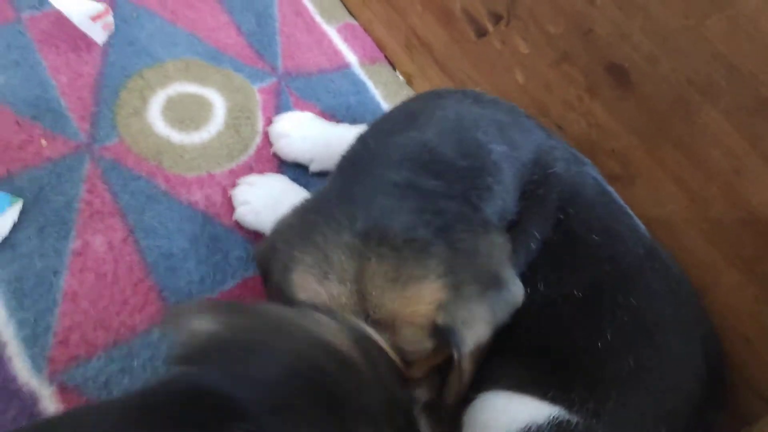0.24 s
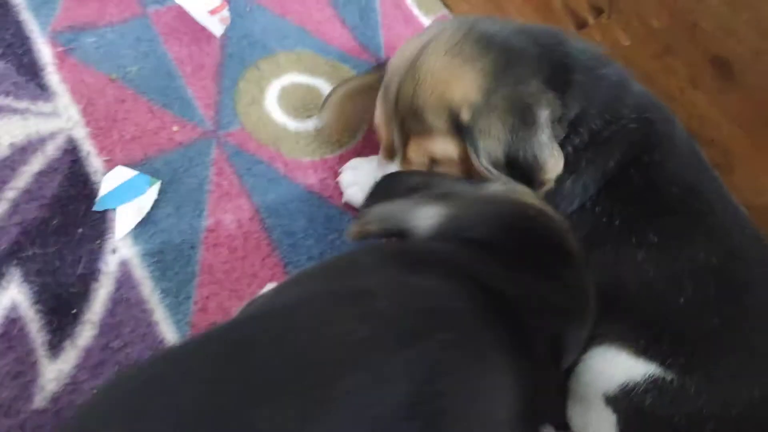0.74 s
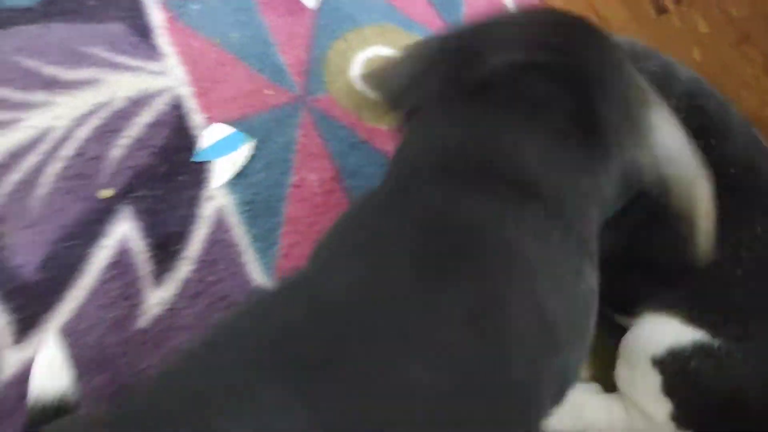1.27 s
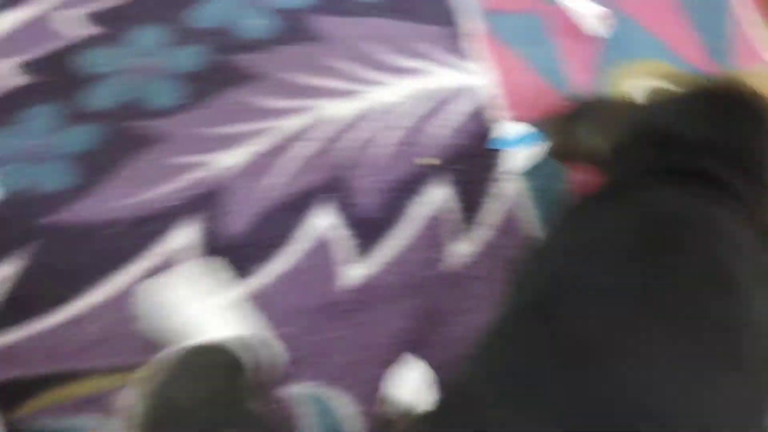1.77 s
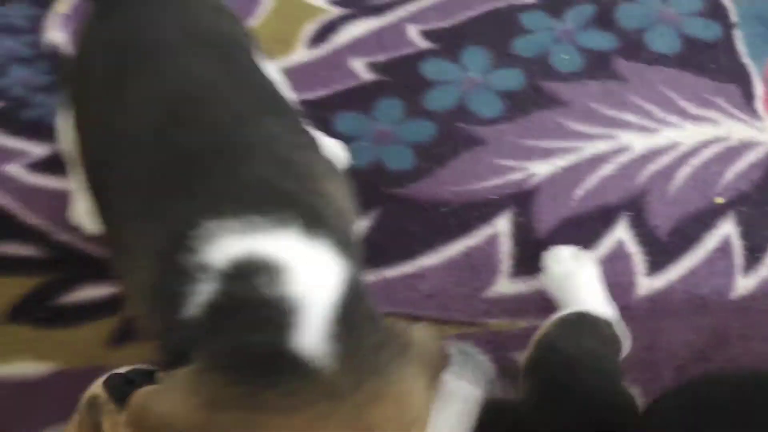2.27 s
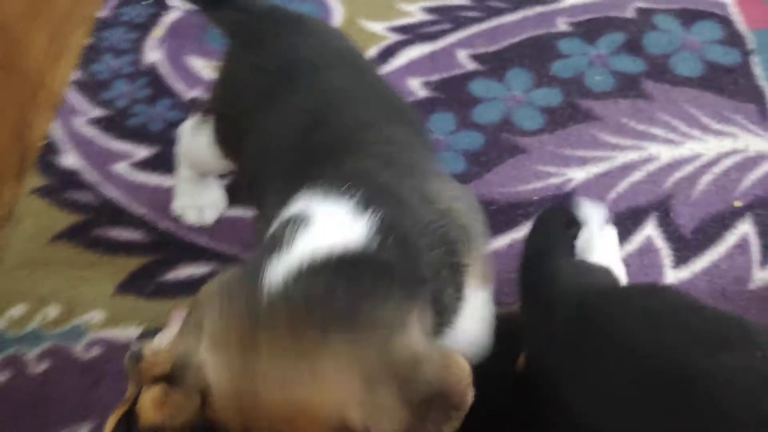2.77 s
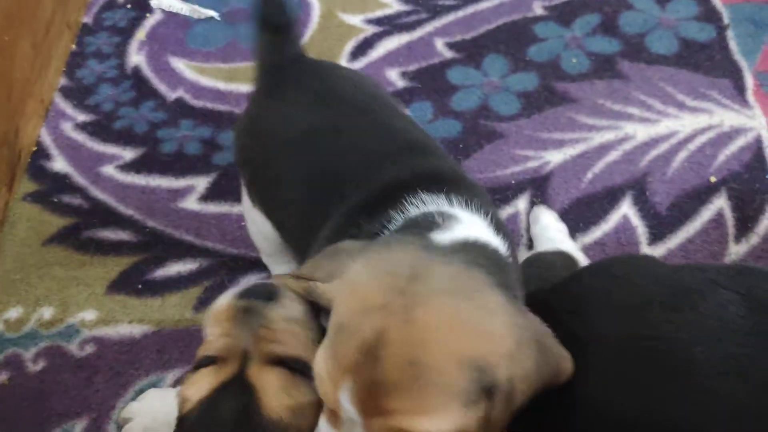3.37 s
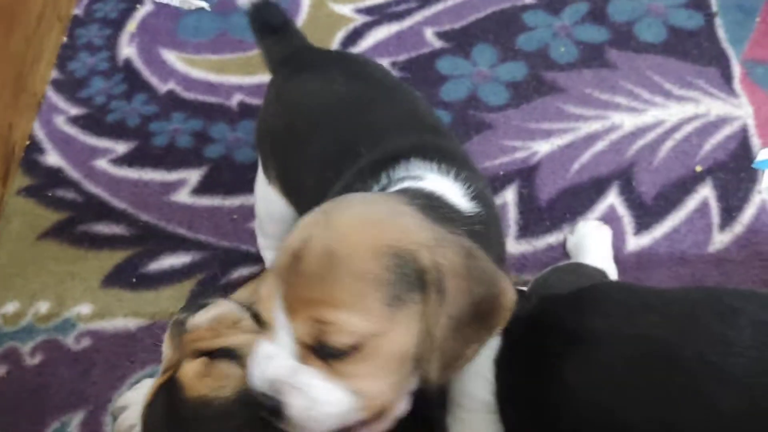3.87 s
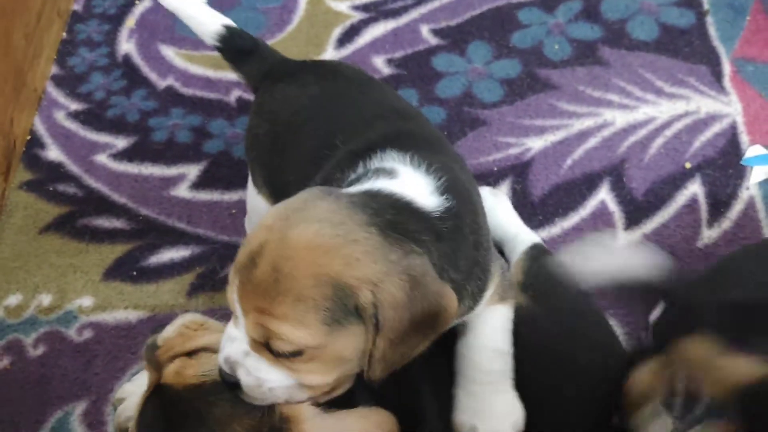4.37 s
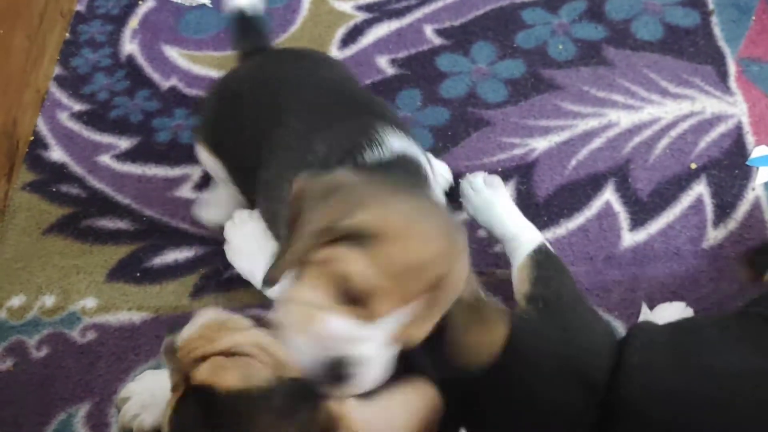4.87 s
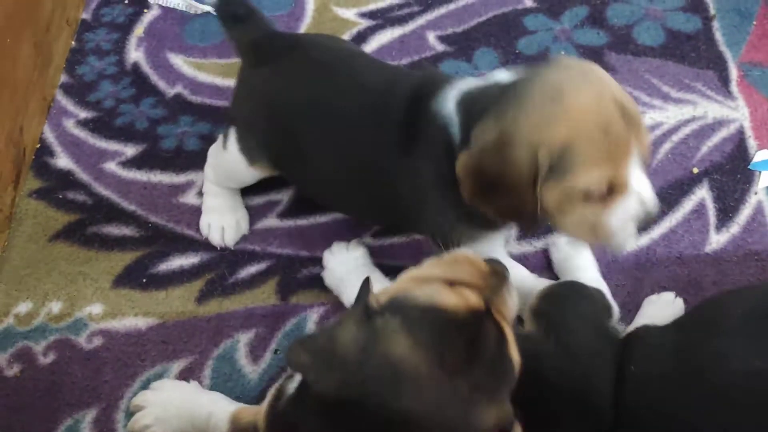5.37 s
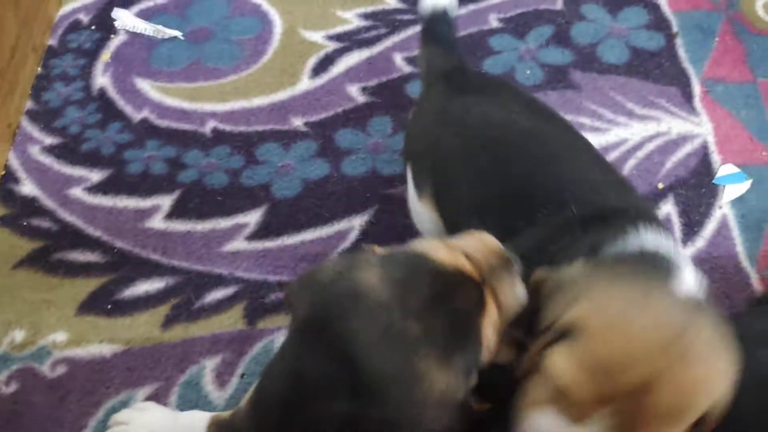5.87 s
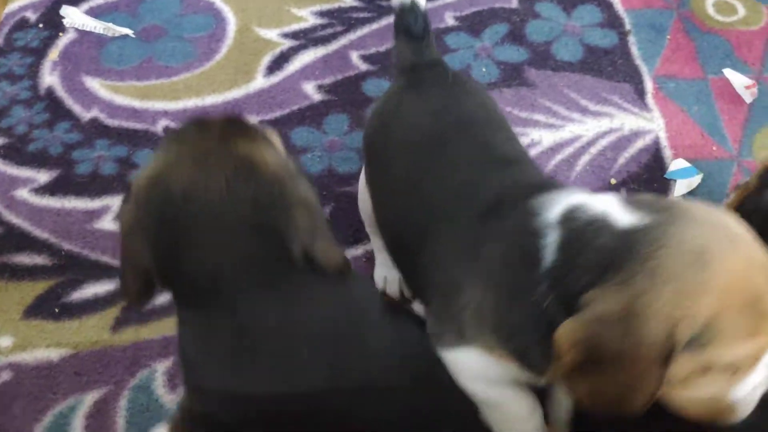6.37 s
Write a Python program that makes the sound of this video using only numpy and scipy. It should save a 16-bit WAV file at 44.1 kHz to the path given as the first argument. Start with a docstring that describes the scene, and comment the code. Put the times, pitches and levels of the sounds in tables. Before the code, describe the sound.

Close to the microphone, young puppies tussle on a rug in a small, quiet room. Over soft air, low rumble and rustling fur come a short falling grunt and thin nasal whimpers. A cluster of soft thuds and brushes follows, then a tight high squeal among faint growls, and a longer, wider cry that slides down into rough growls. One last faint bump and fur rustle end it.

```python
"""A distant whimper is heard first, over quiet air, a low rumble and rustling fur; thin birdlike whistles follow.
Near by, puppies wrestle on a rug in a small room: a grunt, then thin whimpers, soft bumps of paws and bodies,
and a tight cry among low growls. A second, wider cry slides down into growls, and a last bump follows.
Near voices are stacks of harmonics, bumps are ringing tones started by clicks, fur and air are coloured noise,
and the far calls are noise through narrow resonances."""
import sys
import numpy as np
from scipy import signal
from scipy.fft import rfft, irfft, next_fast_len
from scipy.io import wavfile

SR = 44100
rng = np.random.default_rng(int(sys.argv[2]) if len(sys.argv) > 2 else 0)


def store_pcm(level_fs):
    """Save levels as 16-bit WAV."""
    pcm = np.round(np.clip(level_fs, -1, 1) * 32767).astype(np.int16)
    wavfile.write(sys.argv[1], SR, np.atleast_2d(pcm).T)


N = 292250
TIME = np.arange(N) / SR   # seconds

# Tone of the still room air. Each row: frequency in Hz, level in dB per Hz.
AIR_COLOUR = [(59, -30), (100, -1.5), (209, -9), (386, -6.5), (697, -11.5), (898, -15.5), (1160, -15.5),
              (1310, -17), (2930, -18.5), (4560, -24), (15500, -40)]
AIR_DB = -79   # before wide_noise adds 3 dB
# Tone of the low rumble. Each row: frequency in Hz, level in dB per Hz.
RUMBLE_COLOUR = [(11, -33.5), (18, 4), (65, -3), (86, -9), (129, -11.5), (157, -19), (203, -9), (300, -16),
                 (390, -50.5), (660, -120)]
RUMBLE_DB, RUMBLE_SWING_DB, RUMBLE_SWING_HZ = -74, 1.5, 0.89   # level before wide_noise adds 3 dB
# Faint far calls: a distant whimper at the start (two rows), then thin birdlike whistles.
# Each row: start in seconds, length in seconds, pitch in Hz, level in dB.
FAR_CALLS = [(0, 0.55, 2136, -87), (0.075, 0.45, 1180, -84), (0.708, 0.76, 3370, -75.5),
             (0.793, 0.16, 3000, -78), (5.446, 0.96, 3270, -90.5), (5.935, 1, 2934, -82)]
# How alike the noise is on both sides. Each row: frequency in Hz, likeness from 0 to 1.
LIKENESS = [(30, .9), (300, 0.95), (1000, 0.067), (4000, 0.051), (14000, 0.067)]

# Coats sliding slowly over each other.
# Each row: start in seconds, length in seconds, level in dB before wide_noise adds 3 dB.
FUR_SLIDES = [(-.4, 2.15, -85), (0.71, 1.42, -72.5), (1.667, 2.05, -84), (6.36, 0.87, -74.5)]
# Fur brushing on the rug.
# Each row: start in seconds, length in seconds, level in dB before wide_noise adds 3 dB.
FUR_BRUSHES = [(0.59, 0.022, -68.5), (1.441, 0.02, -73), (2.509, 0.055, -73.5), (2.545, 0.14, -69.5),
               (2.724, 0.11, -73), (2.908, 0.089, -67), (3, 0.033, -72.5), (5.262, 0.0096, -63.5),
               (6.104, 0.061, -74.5)]
# Tone of the rustling coats. Each row: frequency in Hz, level in dB per Hz.
RUSTLE_COLOUR = [(600, -26.5), (1600, -15), (3200, -11.5), (6000, -9.5), (9000, -11), (15500, -12)]
# Tone of the brushing on the rug. Each row: frequency in Hz, level in dB per Hz.
BRUSH_COLOUR = [(400, -1), (1250, -2.5), (2000, -11), (3800, -7.5), (7700, -8.5), (15000, -20)]
RUSTLE_DB = -85   # fur never lies quite still; before wide_noise adds 3 dB

# Grunts and growls. Each row: start in seconds, length in seconds, first pitch in Hz, last pitch in Hz,
# rise in seconds, fade in dB, peak level in dB, octave in dB from the peak, overtones in dB from the peak.
GROWLS = [ (0.583, 0.19, 352.3, 183.7, 0.048, 23, -44, -10, -17.5),
          (0.777, 0.067, 211.6, 175, 0.013, 2.5, -69, 6, -7.5),
          (2.732, 0.046, 267, 343, 0.016, 8, -52, -11.5, -19.5),
          (3.675, 0.22, 179.1, 192.6, .07, 11, -62.5, -9.5, -18.5),
          (3.848, .2, 154.9, 199, 0.16, 26, -63.5, -5.5, -19.5),
          (5.071, 0.17, 239.9, 208.2, 0.03, 1.5, -50.5, -20.5, -7),
          (5.229, .265, 228.3, 199.9, 0.054, 16, -47.5, -15.5, -11),
          (5.772, .048, 231.4, 235.6, 0.016, 9, -64.5, -16.5, -6),
          (5.836, .066, 176.3, 169.8, 0.034, 9, -59, -10, -7)]
# Throat and mouth resonances of the growls. Each row: frequency in Hz, level in dB.
GROWL_THROAT = [(450, -3.5), (680, 8.5), (850, 2), (1020, -11.5), (1300, -6.5), (1900, -16), (2700, -18.5),
                (3800, -16.5), (5500, -30.5), (8000, -14.5), (13000, -28.5)]
GROWL_SWELL_DB = 5.5   # from the first beat of the folds to the peak

# Whimpers. Each row: start in seconds, length in seconds, first pitch in Hz, held pitch in Hz,
# settling time in seconds, final sag as a share of the pitch, rise in seconds, swell in dB,
# peak level in dB, octave in dB from the peak, overtones in dB from the peak.
WHIMPERS = [ (1.257, 0.035, 1220, 1348, 0.01, 0, 0.0073, 16, -55.5, -26, -32),
            (1.581, 0.23, 1510, 1453, .09, 0, 0.25, 22, -43, -19, -10),
            (2.029, .32, 1164, 1416, .042, .12, 0.21, 12, -47, -12, -7),
            (2.508, 0.015, 1250, 1120, 0.0078, 0.01, 0.0036, 8, -61.5, -13, -25),
            (2.528, 0.062, 1024, 945, 0.0454, 0, 0.025, 10, -67.5, 4, -16),
            (2.582, 0.03, 916, 790, 0.0175, 0.042, 0.013, 7, -50.5, -17.5, -18)]
# Throat and mouth resonances of the whimpers. Each row: frequency in Hz, level in dB.
WHIMPER_THROAT = [(2500, 2), (3400, -11), (4250, -7), (5000, 3), (5700, -16), (7100, -23), (8500, -27),
                  (10000, -31), (12700, -25), (15500, -51.5)]
WHIMPER_FADE_DB, WHIMPER_SAG_S = 7.5, 0.038   # as the air runs out, level and pitch drop
# shares of the swell and fade that the upper harmonics take
WHIMPER_OCTAVE_FOLLOWS, WHIMPER_OVERTONES_FOLLOW = 0.7, 0.71

# Bumps of paws and bodies. Each row: start in seconds, level in dB before fixed cuts in bumps(),
# brightness in dB (level of the tick against the thud, before those cuts).
BUMPS = [(2.663, -47.5, 2), (2.763, -47.5, -23), (2.909, -42.5, -3), (2.994, -49, 1), (6.112, -56, -13)]
# Tones inside the thud. Each row: pitch in Hz, level in dB, time to fall by 60 dB in seconds.
BUMP_MODES = [(200, -51, 0.022), (378, 6, 0.012), (605, 8.5, 0.0072), (1110, 6.5, 0.0033)]

# Pitch of the first, tight cry. Each row: time in seconds, pitch in Hz.
TIGHT_CRY_PITCH = [(3.757, 1000), (3.775, 996), (3.805, 1101), (3.849, 1054), (3.889, 1109), (4.027, 1055),
                   (4.055, 1123), (4.099, 990), (4.11, 1035)]
# Pitch of the second cry, which slides down. Each row: time in seconds, pitch in Hz.
SLIDING_CRY_PITCH = [(4.35, 923.4), (4.44, 1078), (4.504, 1041), (4.528, 982.5), (4.566, 1012),
                     (4.608, 978), (4.634, 977.5), (4.702, 922.2), (4.724, 968), (4.784, 922),
                     (4.824, 956.6), (4.902, 887.4), (4.942, 797.6), (4.97, 656), (5.002, 609),
                     (5.032, 588), (5.06, 609.5)]
# Loudness of the tight cry before the gains in cries().
# Each row: time in seconds, fundamental in dB, octave in dB, overtones in dB.
TIGHT_CRY_LEVEL = [(3.757, -53, -63.5, -65.5), (3.793, -53, -47.5, -54.5), (3.819, -45.5, -56.5, -55.5),
                   (3.961, -43.5, -55.5, -51), (4.013, -39.5, -28.5, -49), (4.027, -43, -23, -43.5),
                   (4.061, -38, -34.5, -50.5), (4.11, -57.5, -50, -60)]
# Loudness of the sliding cry before the gains in cries().
# Each row: time in seconds, fundamental in dB, octave in dB, overtones in dB.
SLIDING_CRY_LEVEL = [(4.35, -54, -43.5, -53.5), (4.372, -70, -40, -44), (4.442, -53.5, -40, -50),
                     (4.5, -58.5, -44.5, -49), (4.528, -69, -35, -46.5), (4.57, -55, -43.5, -41.5),
                     (4.61, -57, -25, -46), (4.746, -61, -36, -49), (4.908, -49.5, -41.5, -40),
                     (4.952, -42, -36.5, -38.5), (5.008, -54.5, -50, -53.5), (5.052, -52, -59, -51.5),
                     (5.06, -51.5, -59, -60.5)]
# Throat resonances: one list for the tight cry, one for the wider. Each row: frequency in Hz, level in dB.
CRY_THROATS = [
    [(1900, 4), (2700, -43), (3250, -6.5), (3700, -17.5), (4300, -1), (4900, -21.5), (5450, 6.5),
     (6400, -32), (7600, -18), (8700, -25.5), (10000, -37), (12500, -30.5), (15500, -45)],
    [(1900, 8.5), (2400, -22), (2950, -10.5), (3350, -11.5), (3900, 10), (4500, -1.5), (5200, 3.5),
     (6200, -18.5), (7000, -13), (8500, -20.5), (10000, -27), (12500, -31.5), (15500, -48.5)],
]

# hoarseness from 0 to 1: when settled, extra at the onset, and of slack folds
CLEAR, ONSET_ROUGH, SLACK_ROUGH = .18, .7, .85
SETTLE_S = 0.019   # the rough onset dies away
TAUT_HZ, SLACK_HZ = 930, 560
FADE_IN_S, FADE_OUT_S = 0.005, 0.0044
# Moments when the voice cracks and then settles again, in seconds.
VOICE_BREAKS = [2.14, 2.303, 3.997]

# Where the puppies are. Each row: time in seconds, left against right in dB.
PLACE = [(.6, -3), (1.7, -2.5), (2.2, -1.5), (2.7, -9), (3.9, -5), (4.1, -0.5), (4.6, -6), (5.2, 1),
         (6.2, -3)]
# Sound bends round the recorder to the left port. Each row: frequency in Hz, lag in milliseconds.
PORT_LAG = [(200, 0.073), (1000, 0.23), (1500, 0.063), (2100, 0.13), (3000, .15), (4100, 0.18),
            (5300, 0.15), (8000, .165)]
# How long the room rings. Each row: frequency in Hz, time to fall by 60 dB in seconds.
ROOM_T60 = [(150, 0.16), (600, 0.43), (2000, 0.33), (5000, 0.36), (14000, 0.061)]
# Tone of the reflections as they begin. Each row: frequency in Hz, relative level in dB.
ROOM_COLOUR = [(200, 0.5), (1000, -0.5), (2000, 3.5), (4000, -3.5), (10000, -0.5)]
# Two microphone ports colour the sound differently. Each row: frequency in Hz, left against right in dB.
PORTS = [(600, 0), (900, 2), (1150, -5), (1500, 1), (2100, 6.5), (3000, 3), (4400, 4.5), (5500, -2),
         (8000, -10), (10000, 0.5), (12000, 7.5), (15000, 15)]
CUTOFF_HZ = 15550


def from_db(db):
    """Turn decibels into a plain multiplier."""
    return 10 ** (np.asarray(db) / 20)


def rms_one(x):
    """Scale a sound to an average strength (rms) of 1."""
    return x / np.sqrt(np.mean(x ** 2) + 1e-20)


def in_time(rows, t):
    """Read the columns of a curve at times t."""
    s, *columns = np.transpose(rows)
    return [np.interp(t, s, c) for c in columns]


def at_hz(points, hz):
    """Read a curve over frequency, with equal steps per octave."""
    f, value = np.transpose(points)
    return np.interp(np.log(np.maximum(hz, 1)), np.log(f), value)


def drift(rate_hz, size):
    """Random wandering of spread 1, mostly slower than the given rate."""
    padded = next_fast_len(max(size, SR), real=True)
    hz = np.fft.rfftfreq(padded, 1 / SR)
    spectrum = rfft(rng.standard_normal(padded)) / (1 + (hz / rate_hz) ** 2)
    return rms_one(irfft(spectrum, padded))[:size]


def noise(colour, size):
    """Noise with the given spectrum, falling steeply beyond its ends; rms 1."""
    padded = next_fast_len(size, real=True)
    hz = np.fft.rfftfreq(padded, 1 / SR) + 1
    low_end = 1 / (1 + (.8 * colour[0][0] / hz) ** 6)
    high_end = 1 / (1 + (hz / colour[-1][0] / 1.2) ** 6)
    spectrum = rfft(rng.standard_normal(padded)) * from_db(at_hz(colour, hz)) * low_end * high_end
    return rms_one(irfft(spectrum, padded)[:size])


def wide_noise(colour):
    """Stereo noise, alike in the bass and nearly unrelated in the treble; each side is 3 dB above rms 1."""
    mid, side = noise(colour, N), noise(colour, N)
    padded = next_fast_len(N, real=True)
    alike = np.clip(at_hz(LIKENESS, np.fft.rfftfreq(padded, 1 / SR)), 0, 1)
    shared = np.sqrt(1 + alike) * rfft(mid, padded)
    opposed = np.sqrt(1 - alike) * rfft(side, padded) * [[1], [-1]]
    return irfft(shared + opposed, padded)[:, :N]


def swell(start, length):
    """A quick rise and a slower fall, height 1."""
    return np.sin(np.pi * np.sqrt(np.clip((TIME - start) / length, 0, 1)))


def ring(clicks, hz, t60):
    """A unit click sets a sine of about height 1 ringing; it falls by 60 dB in t60 seconds."""
    r, w = from_db(-60 / (t60 * SR)), 2 * np.pi * hz / SR
    return signal.lfilter([0, np.sin(w)], [1, -2 * r * np.cos(w), r * r], clicks + 1e-18)


def background():
    """Room air and a low wavering rumble are noise; the faint far calls are noise that rings at one pitch."""
    far = 0
    for start, length, hz, db in FAR_CALLS:
        far_tone = rms_one(ring(rng.standard_normal(N), hz, 0.12))
        far = far + from_db(db) * swell(start, length) * far_tone
    rumble_db = RUMBLE_DB + RUMBLE_SWING_DB * drift(RUMBLE_SWING_HZ, N)
    rumble = from_db(rumble_db) * wide_noise(RUMBLE_COLOUR)
    return from_db(AIR_DB) * wide_noise(AIR_COLOUR) + rumble + far


def fur():
    """Coats slide over each other and brush the rug: noise that swells with each movement."""
    strokes = sum(from_db(db) * swell(s, length) for s, length, db in FUR_BRUSHES)
    sliding = 0
    for start, length, db in FUR_SLIDES:
        progress = np.clip((TIME - start) / length, 0, 1)
        sliding = sliding + from_db(db) * np.sin(np.pi * progress) ** 2
    rustle = (from_db(RUSTLE_DB) + sliding) * from_db(0.95 * drift(10, N))
    return strokes * wide_noise(BRUSH_COLOUR) + rustle * wide_noise(RUSTLE_COLOUR)


def span(start, length):
    """The sample times of one call."""
    return TIME[(TIME >= start) & (TIME < start + length)]


def effort_db(age, rise, swell_db, fade_db):
    """A call swells to its peak (0 dB), then fades until it ends."""
    rise = np.clip(rise, age[1], age[-2])
    return np.interp(age, [0, rise, age[-1]], [-swell_db, 0, -fade_db])


def hoarseness(t, pitch):
    """Folds are rough at the onset and after a break, then settle; slack at low pitch, they beat unevenly."""
    slack = np.interp(pitch, [SLACK_HZ, TAUT_HZ], [SLACK_ROUGH, CLEAR])
    upset = sum((t >= s) * np.exp(-np.abs(t - s) / SETTLE_S) for s in [t[0], *VOICE_BREAKS])
    return np.clip(slack + ONSET_ROUGH * upset, 0, 1)


def call(t, pitch, levels_db, throat, waver, jitter, shimmer_db, flutter_db, rasp_db, count):
    """Vocal folds give a stack of harmonics; the throat shapes those above the octave."""
    first_db, octave_db, upper_db = levels_db
    hoarse = hoarseness(t, pitch)
    pitch = pitch * (1 + waver * drift(30, len(t)))
    # hoarse folds change their period and their swing from one cycle to the next
    cycle_hz = np.mean(pitch) / 2
    uneven_pitch = pitch * (1 + jitter * hoarse * drift(cycle_hz, len(t)))
    phase = 2 * np.pi * np.cumsum(uneven_pitch) / SR
    swing = from_db(shimmer_db * hoarse * drift(cycle_hz, len(t)))
    k = np.arange(3, count)[:, None]   # harmonic numbers
    # each overtone flutters on its own as the head twists
    flutter = flutter_db * np.array([drift(14, len(t)) for _ in k])
    gains = from_db(at_hz(throat, k * pitch) + flutter) * (k * pitch < CUTOFF_HZ)
    waves = np.sin(k * phase + rng.uniform(0, 2 * np.pi, k.shape))
    # the throat sets the balance of the overtones, not their total level
    overtones = np.sum(gains * waves, axis=0) / np.sqrt(np.sum(gains ** 2, axis=0))
    # air hisses through the folds once a cycle
    rasp = from_db(rasp_db) * hoarse * noise(throat, len(t)) * (1 + np.cos(phase)) / 2
    tone = from_db(first_db) * np.sin(phase) + from_db(octave_db) * np.sin(2 * phase)
    tone = tone + from_db(upper_db) * (overtones + rasp)
    fade_in = np.clip((t - t[0]) / FADE_IN_S, 0, 1)
    fade_out = np.clip((t[-1] - t) / FADE_OUT_S, 0, 1)
    out = np.zeros(N)
    # the root of 2 makes each sine's rms match its level
    out[np.rint(t * SR).astype(int)] = np.sqrt(2) * tone * fade_in * fade_out * swing
    return out


def growls():
    """Slack folds beat unevenly while the pitch glides from first to last."""
    out = 0
    for start, length, first_hz, last_hz, rise, fade_db, peak_db, octave_db, upper_db in GROWLS:
        t = span(start, length)
        pitch = np.linspace(first_hz, last_hz, len(t))
        level = peak_db + effort_db(t - t[0], rise, GROWL_SWELL_DB, fade_db)
        levels = level, level + octave_db, level + upper_db
        out = out + call(t, pitch, levels, GROWL_THROAT, waver=.042, jitter=.07,
                         shimmer_db=2.5, flutter_db=0.5, rasp_db=-3.5, count=30)
    return out


def whimpers():
    """Thin whines through the nose: each moves onto a held pitch, swells, and fades; some sag at the end."""
    out = 0
    for (start, length, first_hz, held_hz, settling, sag, rise,
         swell_db, peak_db, octave_db, upper_db) in WHIMPERS:
        t = span(start, length)
        age, left = t - t[0], t[-1] - t
        pitch = held_hz + (first_hz - held_hz) * np.exp(-(age / settling) ** 3)
        pitch = pitch * (1 - sag * np.exp(-(left / WHIMPER_SAG_S) ** 2))
        effort = effort_db(age, rise, swell_db, WHIMPER_FADE_DB)
        levels = (peak_db + effort,
                  peak_db + octave_db + WHIMPER_OCTAVE_FOLLOWS * effort,
                  peak_db + upper_db + WHIMPER_OVERTONES_FOLLOW * effort)
        out = out + call(t, pitch, levels, WHIMPER_THROAT, waver=0.0047, jitter=0.049,
                         shimmer_db=1.0, flutter_db=4.0, rasp_db=-3.5, count=13)
    return out


def bumps():
    """Paws and bodies land on the rug: a dead thud of short ringing tones, with a small tick on top."""
    s, level_db, bright_db = np.transpose(BUMPS)
    at = (s * SR).astype(int)
    clicks, ticks = np.zeros(N), np.zeros(N)
    clicks[at] = from_db(level_db - 8.5)
    ticks[at] = from_db(level_db + bright_db - 2)
    thud = sum(ring(clicks, hz, t60) * from_db(db) for hz, db, t60 in BUMP_MODES)
    return thud + ring(ticks, 2250, 0.0023)


def cry(pitches, levels, throat, first_gain_db, octave_gain_db, upper_gain_db):
    """One open-mouthed squeal: harmonics follow drawn curves of pitch and level."""
    t = span(levels[0][0], levels[-1][0] - levels[0][0] + FADE_OUT_S / 2)
    first_db, octave_db, upper_db = in_time(levels, t)
    levels_db = first_db + first_gain_db, octave_db + octave_gain_db, upper_db + upper_gain_db
    return call(t, in_time(pitches, t)[0], levels_db, throat, waver=0.00752, jitter=0.03,
                shimmer_db=-0.06, flutter_db=4.5, rasp_db=-5.0, count=22)


def cries():
    """A tight cry, then one from a wider throat that slides down."""
    tight = cry(TIGHT_CRY_PITCH, TIGHT_CRY_LEVEL, CRY_THROATS[0],
                first_gain_db=0.0, octave_gain_db=0.5, upper_gain_db=3.0)
    sliding = cry(SLIDING_CRY_PITCH, SLIDING_CRY_LEVEL, CRY_THROATS[1],
                  first_gain_db=2.5, octave_gain_db=-0.5, upper_gain_db=2.0)
    return tight + sliding


def placed(x):
    """The direct sound is louder on the near side and reaches the left port late."""
    pan_db = in_time(PLACE, TIME)[0]
    padded = next_fast_len(N + SR // 10, real=True)
    hz = np.fft.rfftfreq(padded, 1 / SR)
    delay = np.exp(-2j * np.pi * hz * at_hz(PORT_LAG, hz) / 1000)
    left = irfft(rfft(x, padded) * delay, padded)[:N]
    return np.array([left * from_db(pan_db / 2), x * from_db(-pan_db / 2)])


def room(x, wet_db):
    """Add diffuse reflections: noise that dies away at its own speed in each octave."""
    t, edges = TIME[:SR * 3 // 4], 68 * 2 ** np.arange(9.)   # octave edges in Hz
    white = rng.standard_normal((2, len(t)))
    tail = 0
    for low, high in zip(edges, edges[1:]):
        hz = np.sqrt(low * high)
        band = signal.sosfilt(signal.butter(2, [low, high], "band", fs=SR, output="sos"), white)
        decay = np.exp(-np.log(1000) * t / at_hz(ROOM_T60, hz))
        tail = tail + band * from_db(at_hz(ROOM_COLOUR, hz)) * decay
    tail = tail * np.clip(t / 0.00069, 0, 1)   # brief fade-in
    tail = tail / np.sqrt(np.sum(tail ** 2) / 2)   # average energy of 1 per side
    return placed(x) + from_db(wet_db) * signal.fftconvolve(x[None], tail, axes=1)[:, :N]


def scene():
    """Voices and bumps sound in the room, the whimpers with the most reflections; fur and air join them."""
    low_sounds = room(growls() + bumps(), wet_db=-9)
    puppies = low_sounds + room(whimpers(), wet_db=-7) + room(cries(), wet_db=-9.0)
    return background() + fur() + puppies


def record(dry):
    """Each port adds its colour; the top is cut."""
    padded = next_fast_len(N + SR // 10, real=True)
    tilt_db = at_hz(PORTS, np.fft.rfftfreq(padded, 1 / SR))
    heard = irfft(rfft(dry, padded) * from_db(tilt_db * [[.5], [-.5]]), padded)[:, :N]
    return signal.sosfilt(signal.ellip(12, .1, 70, CUTOFF_HZ, fs=SR, output="sos"), heard)


dry = scene()
out = record(dry)
store_pcm(out)
```